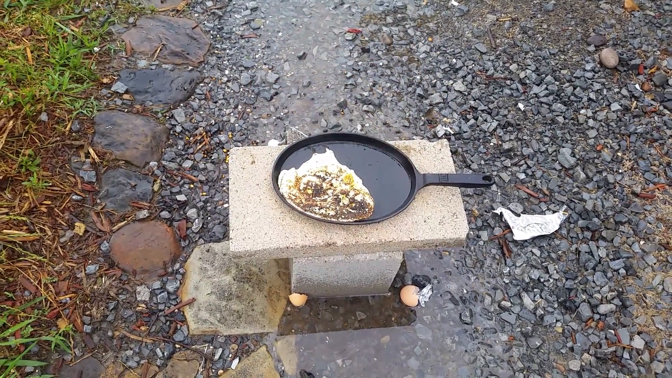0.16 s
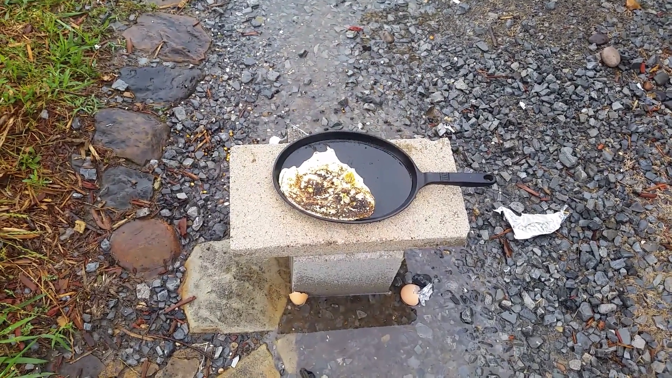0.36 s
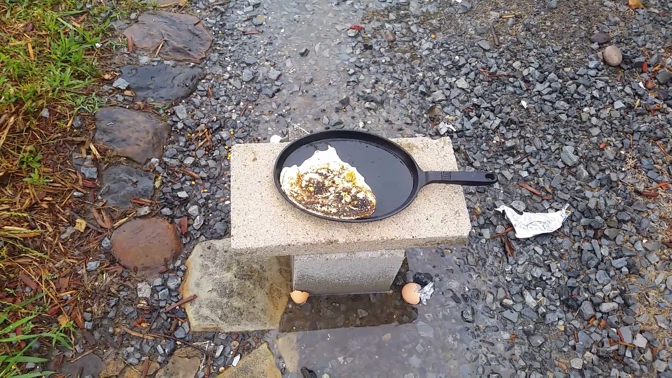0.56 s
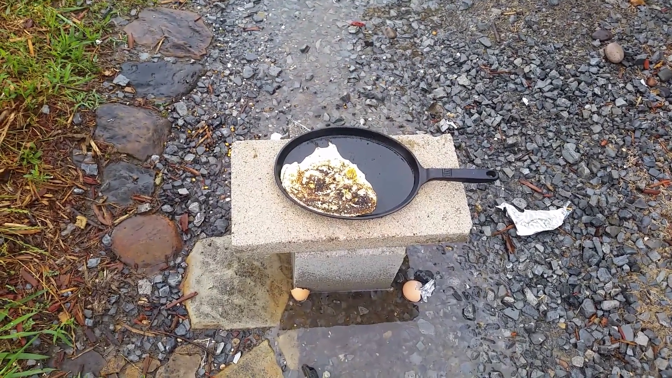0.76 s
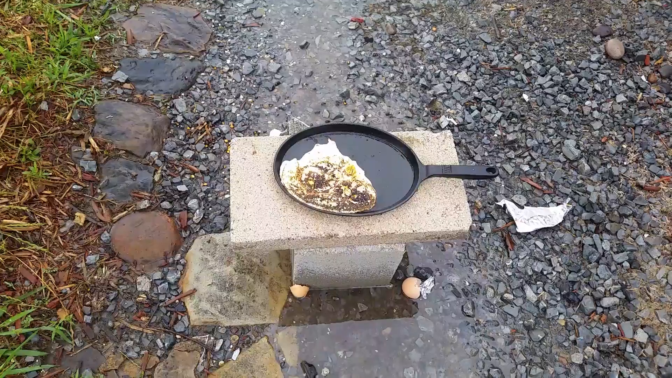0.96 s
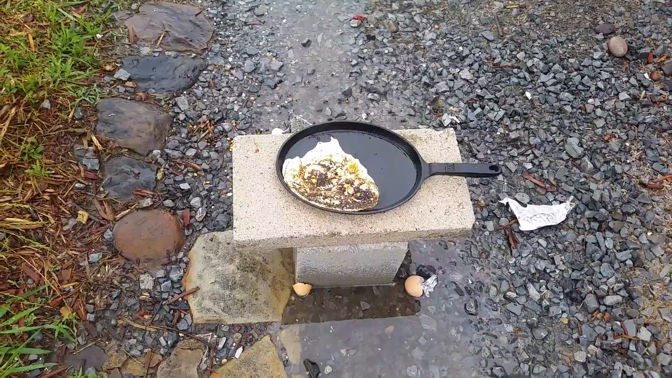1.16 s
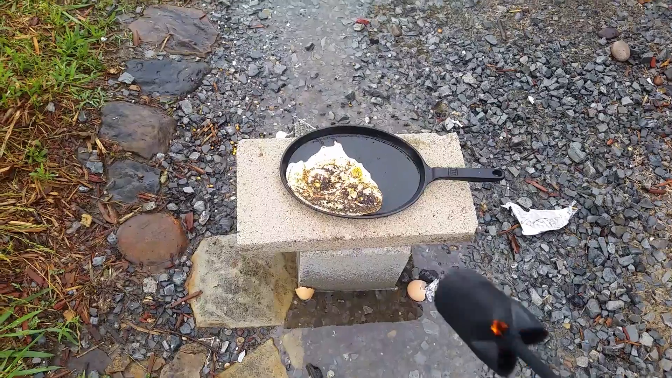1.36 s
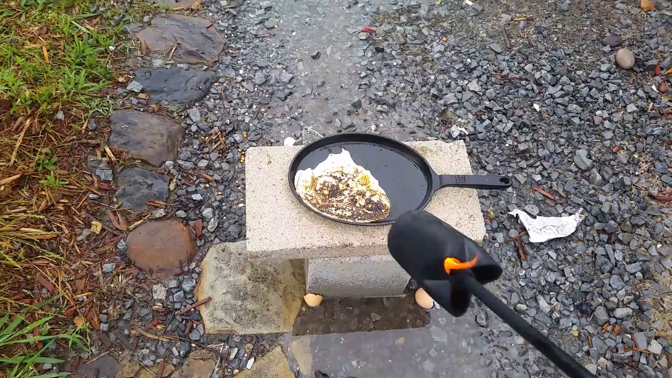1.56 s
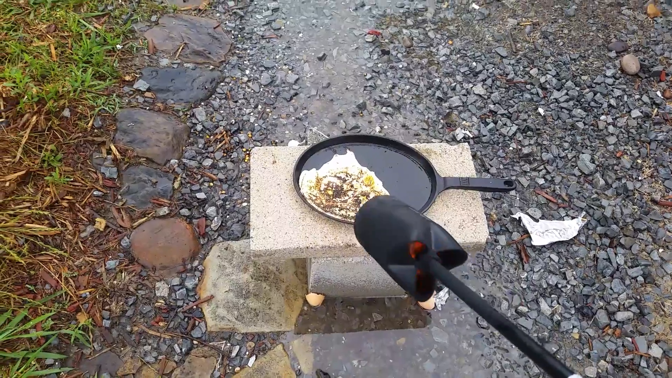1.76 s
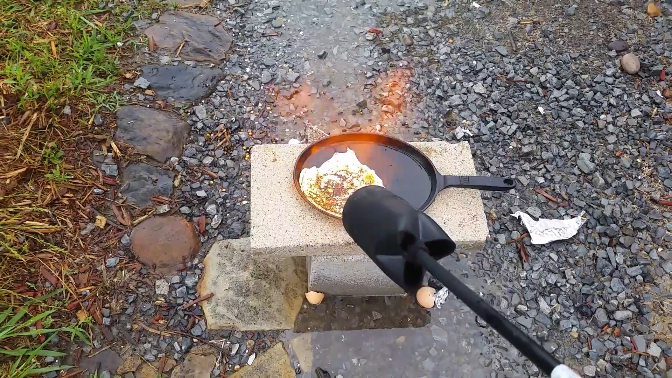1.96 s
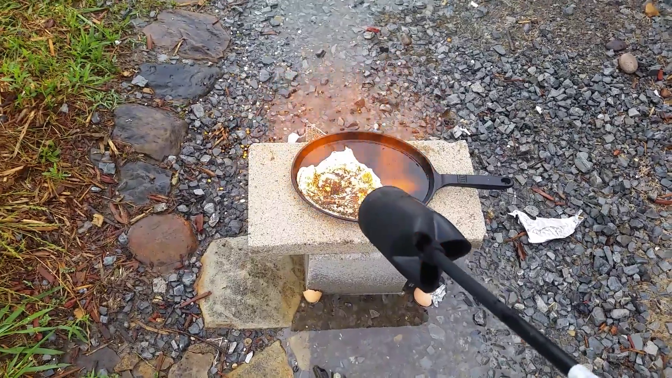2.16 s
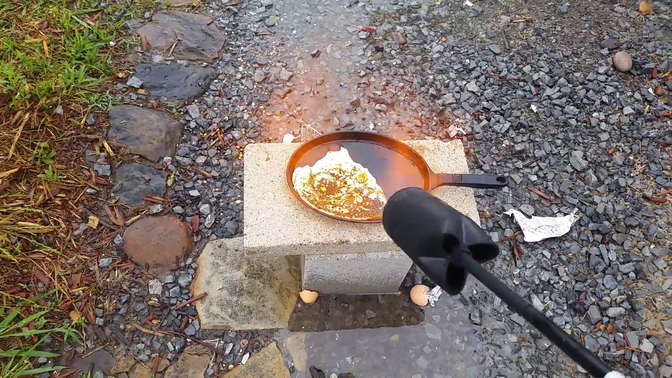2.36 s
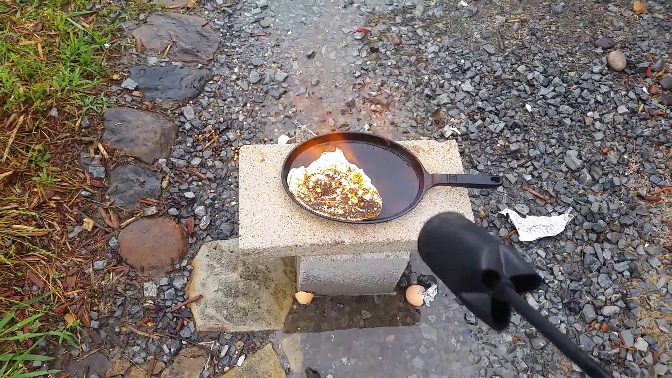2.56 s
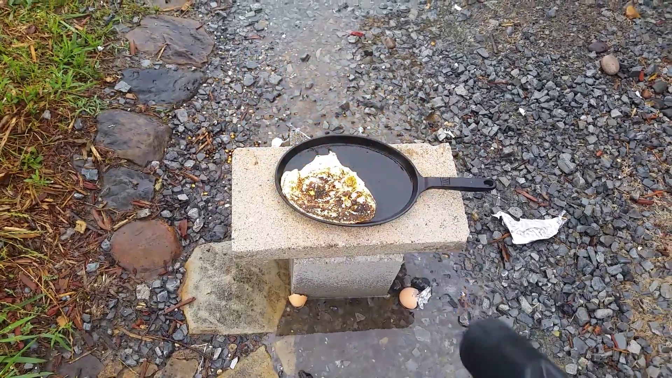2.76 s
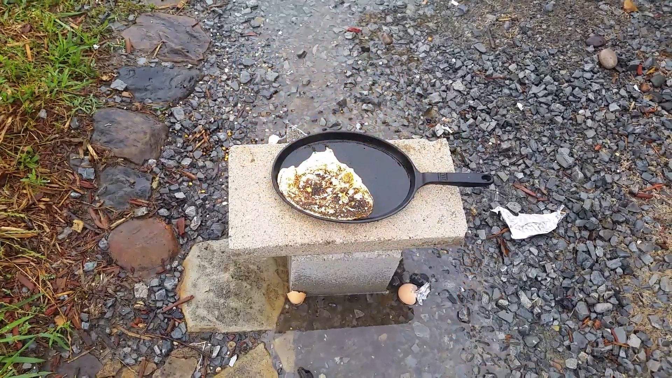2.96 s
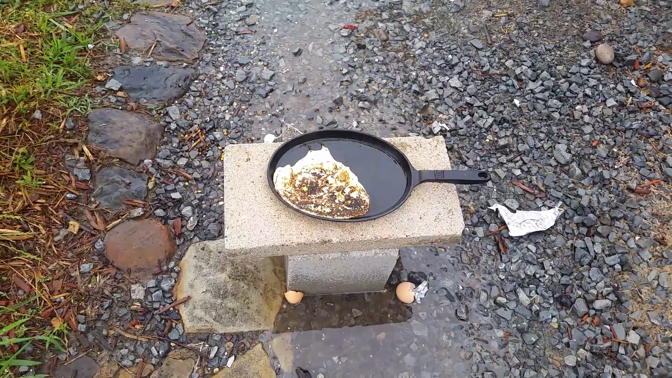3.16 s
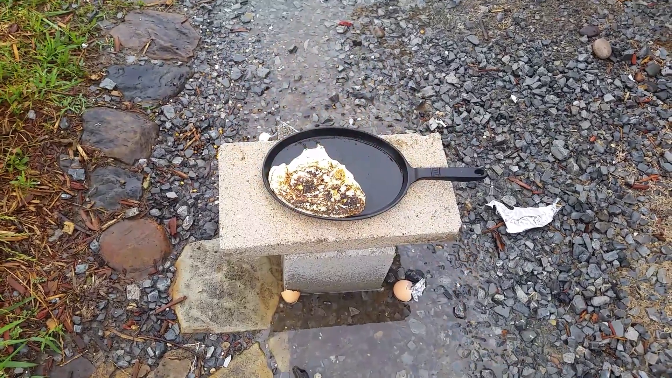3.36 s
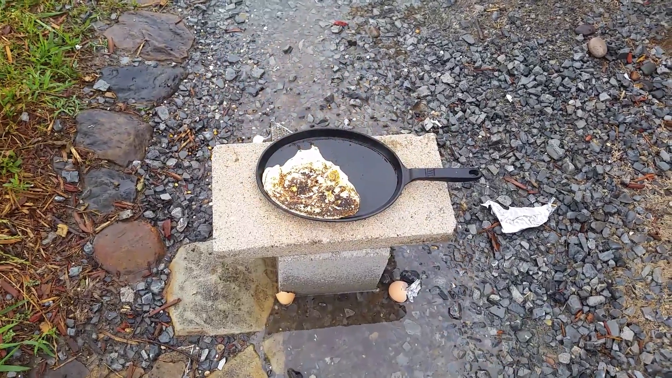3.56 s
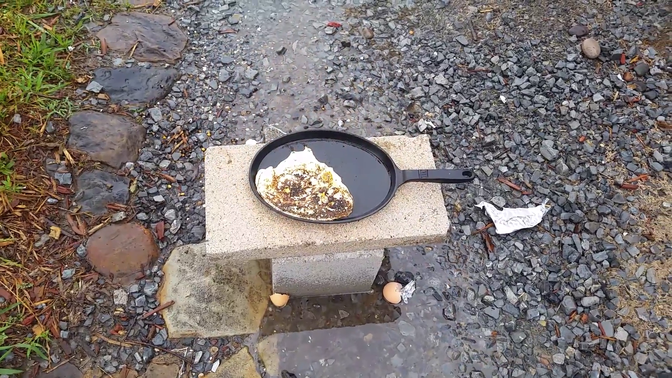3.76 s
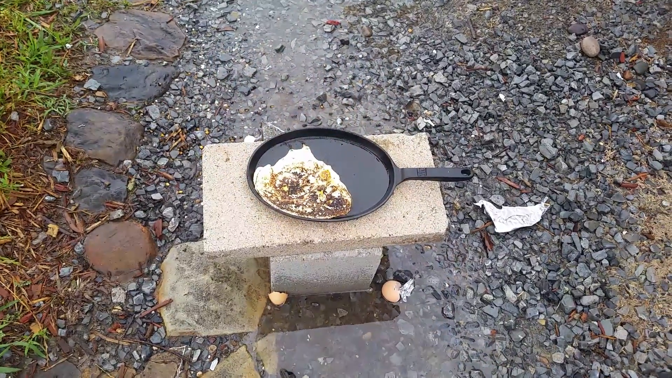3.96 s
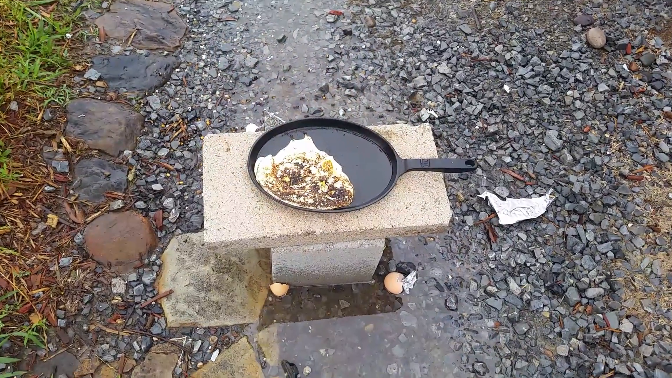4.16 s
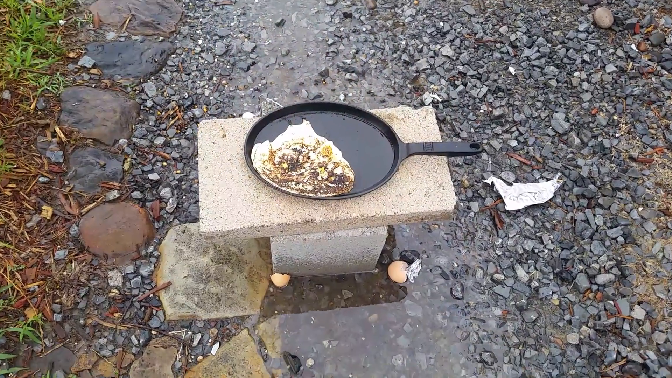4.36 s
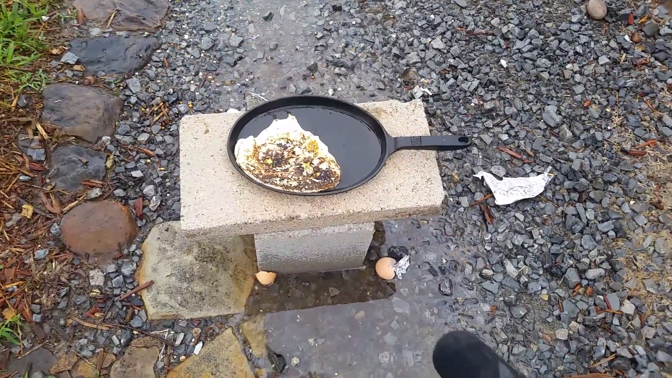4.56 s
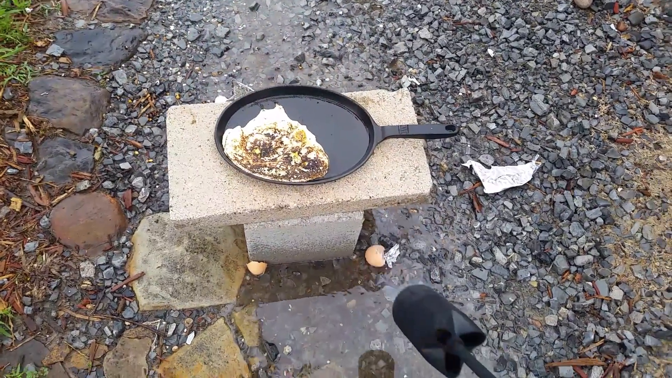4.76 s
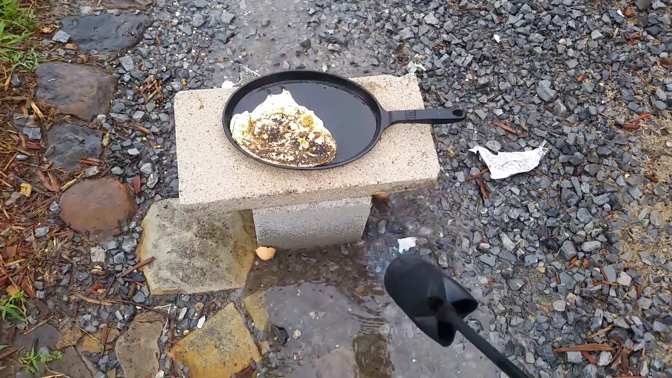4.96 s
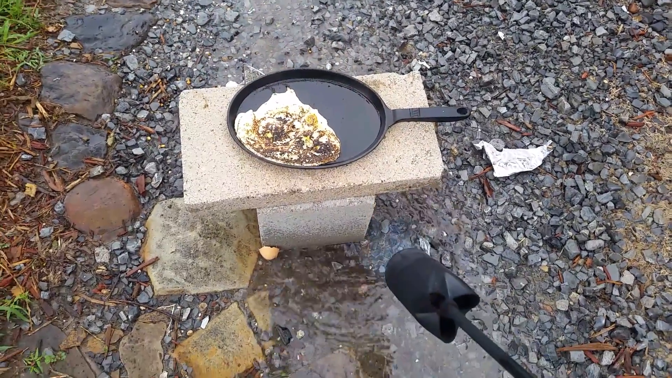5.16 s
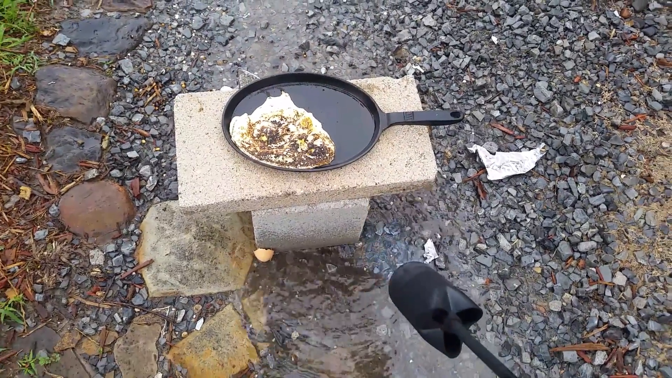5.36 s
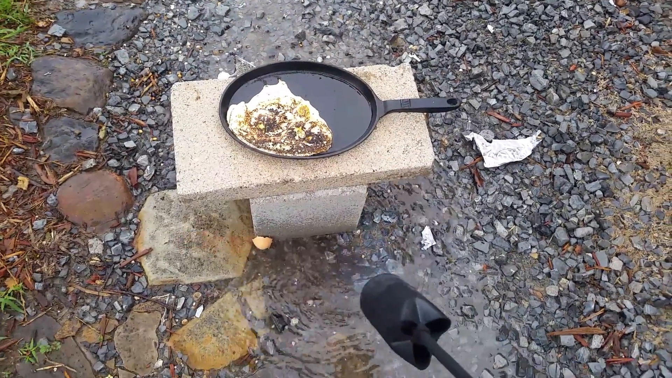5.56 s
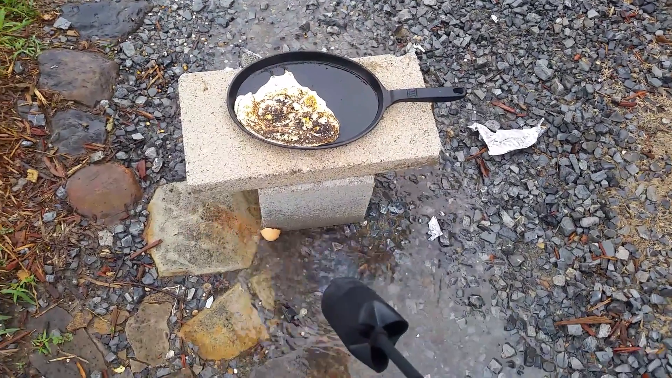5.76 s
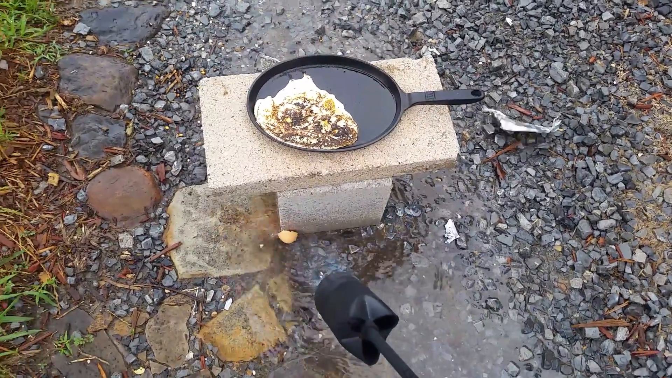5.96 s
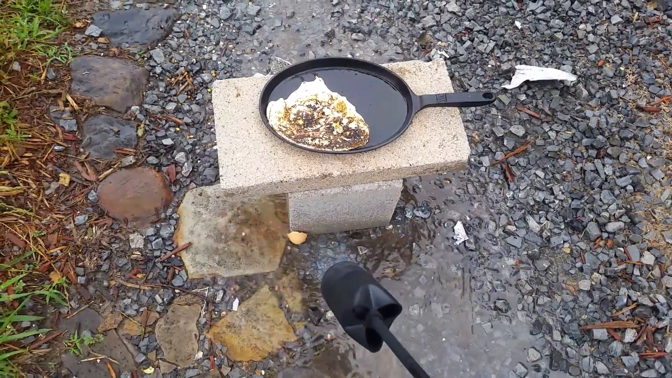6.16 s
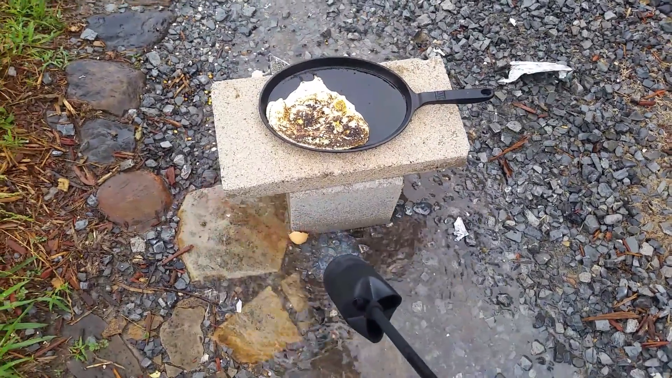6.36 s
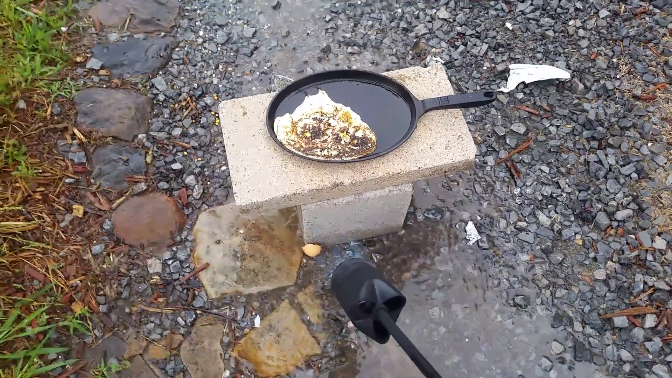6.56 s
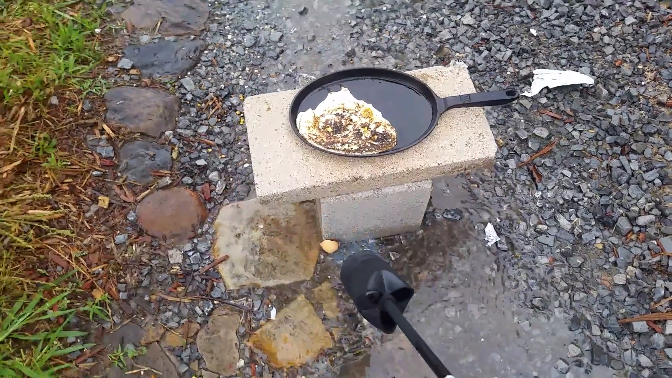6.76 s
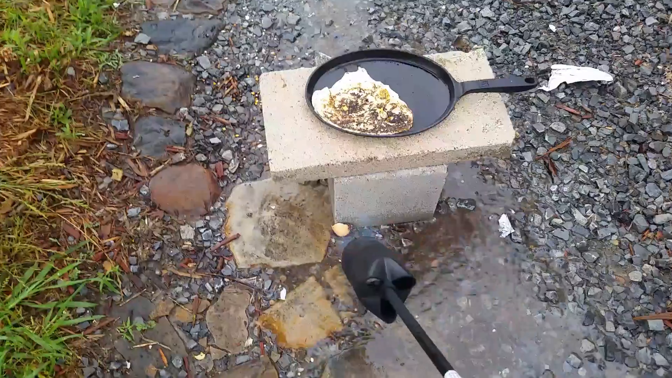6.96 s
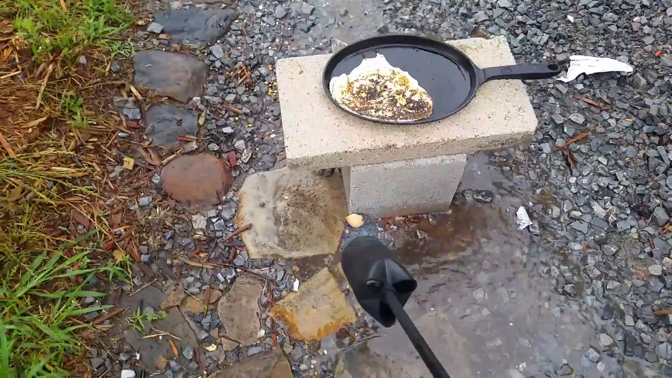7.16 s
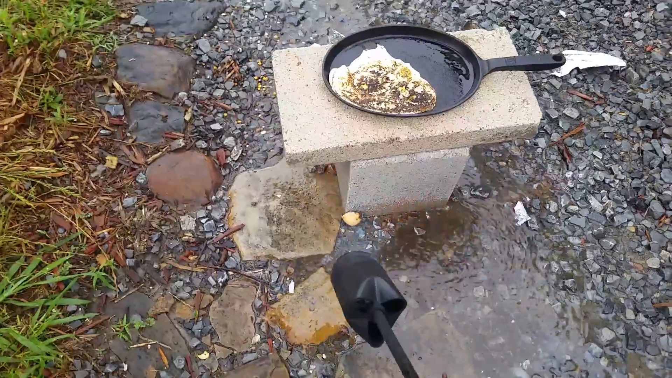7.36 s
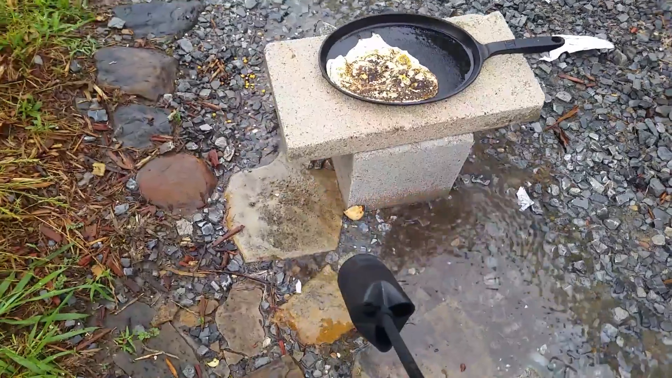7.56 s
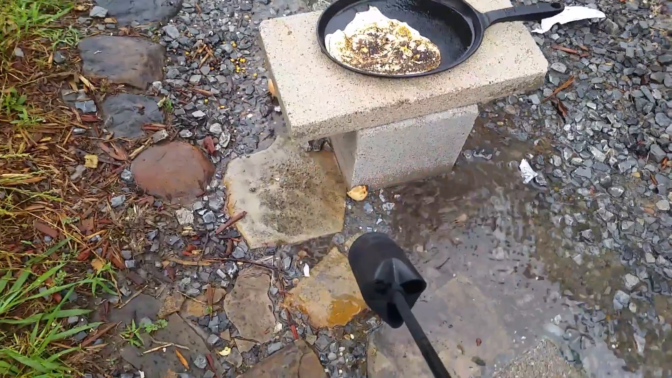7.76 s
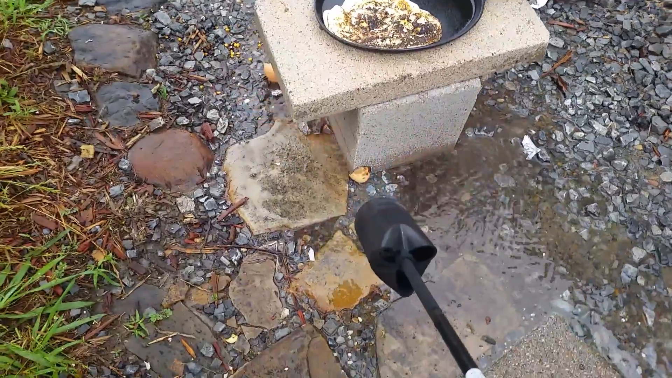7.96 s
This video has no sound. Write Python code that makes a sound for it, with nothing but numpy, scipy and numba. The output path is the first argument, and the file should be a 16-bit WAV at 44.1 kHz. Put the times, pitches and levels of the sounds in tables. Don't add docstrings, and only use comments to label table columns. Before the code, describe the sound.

Outdoors, hot fat ticks and a small flame hisses before a gas torch thumps alight, roars briefly, stops, then relights harder and roars on.

```python
import sys
import numpy as np
from scipy import signal
from scipy.fft import rfft, irfft, next_fast_len
from scipy.io import wavfile
from scipy.ndimage import uniform_filter1d
from numba import njit

SR = 44100
rng = np.random.default_rng(int(sys.argv[2]) if len(sys.argv) > 2 else 0)


def to_wav(s):
    ch = np.atleast_2d(s).T
    pcm = np.round(np.clip(ch, -1, 1) * 32767)
    wavfile.write(sys.argv[1], SR, pcm.astype(np.int16))


def level_to_linear(level):
    exponent = np.asarray(level, float) / 20
    return 10 ** exponent


N = 353241


def seconds():
    return np.arange(N) / SR


def rms_one(x):
    return x / np.sqrt(np.mean(x ** 2) + 1e-20)


def in_time(rows, silent=None):
    times, *columns = np.transpose(rows)
    return np.array([np.interp(seconds(), times, column, silent, silent) for column in columns])


def at_hz(points, hz):
    point_hz, value = np.array(points).T[:2]
    return np.interp(np.log(hz + 1), np.log(point_hz + 1), value)


def drift(rate):
    r = np.exp(-2 * np.pi * rate / SR)
    wander = signal.lfilter([1], [1, -2 * r, r * r], rng.standard_normal(N + SR))
    return rms_one(wander[SR:])


def lowpass(x, hz):
    return signal.sosfilt(signal.butter(2, hz, fs=SR, output="sos"), x)


def resonance(x, hz, width_hz):
    r = np.exp(-np.pi * width_hz / SR)
    push = np.array([1, 0, -1]) * (1 - r * r) / 2
    return signal.lfilter(push, [1, -2 * r * np.cos(2 * np.pi * hz / SR), r * r], x + 1e-18)


@njit
def gliding_resonance(x, two_r_cos, r):
    y = np.zeros_like(x)
    for i in range(2, len(x)):
        push = (1 - r[i]) * (x[i] - x[i - 2])
        y[i] = push + two_r_cos[i] * y[i - 1] - r[i] * r[i] * y[i - 2]
    return y


# (pitch [Hz], left minus right [dB])
PORT_BALANCE = [(60, -0.7), (250, -1), (700, 0.2), (1300, 5.5), (2400, 6.5), (3200, 9.5), (5500, 14),
                (7000, 8.5), (8500, -1.4), (15000, 0.4)]
# (pitch [Hz], phase [radians])
LEFT_LEAD = [(20, -.1), (250, .1), (1120, .5), (2410, .5), (3010, .05), (3450, -1.2), (3960, .05),
             (16600, -.1)]
# (pitch [Hz], likeness [-1 to 1])
FLAME_LIKENESS = [(60, .993), (250, .99), (500, .94), (1000, .72), (2400, .68), (4000, .45), (7000, .22),
                  (14000, .45)]
# (pitch [Hz], likeness [-1 to 1])
AIR_LIKENESS = [(60, .81), (130, .89), (290, .36), (640, .18), (1400, 0), (15000, 0)]


def port_noise(colour, likeness):
    size = next_fast_len(N)
    hz = np.arange(size // 2 + 1) * SR / size
    mid, side = rfft(rng.standard_normal((2, size)))
    alike = np.clip(at_hz(likeness, hz), -1, 1)
    tilt = level_to_linear(at_hz(PORT_BALANCE, hz))
    shared, different = np.sqrt(1 + alike) * mid, np.sqrt(1 - alike) * side
    left = (shared + different) * tilt / (1 + tilt) * np.exp(1j * at_hz(LEFT_LEAD, hz))
    right = (shared - different) / (1 + tilt)
    pair = irfft(level_to_linear(at_hz(colour, hz)) * np.array([left, right]), size)[:, :N]
    return pair / np.std(pair.mean(axis=0))


def torch():
    rumble_gain, boom_gain, bell_gain, jet_gain, bass_gain = burn_gains()
    eddies = drift(35)
    low = rumble_gain * rumble(eddies, bass_gain)
    flame = boom_gain * level_to_linear(0.73 * eddies + 0.37 * drift(10)) * boom()
    flame += bell_gain * level_to_linear(0.4 * eddies + 0.57 * drift(14)) * bell()
    hiss = jet_gain * jet(eddies)
    return low + ground_echo(flame) + dulled(hiss) - lighting_dips()


# (rumble [dB], boom [dB], bell [dB], jet [dB], bass added near the ground [dB])
BURNS = [
    (-20, -24, -25, -27.5, 2),
    (-17, -23.5, -27, -26.5, -12.5),
]
# (gas starts [s], jet full [s], cloud lights [s], flame full [s])
VALVE = [
    (1.9165, 1.928, 1.919, 1.943),
    (4.776, 4.796, 4.806, 4.815),
]
# (time [s], hollow pitch [Hz], gas flow [dB],
# flame into the hollow [dB], bell turned to the ports [dB])
WAND = [(1.95, 390, 0, -1.3, -9), (2.12, 363, 0, 1, 4.5), (2.35, 352, 0.1, 1, -5.5),
        (2.65, 355, 0.5, 1, 4.5), (4.85, 283, 0, -2.5, -3), (5.08, 260, 0, 3.5, 6.5),
        (5.45, 256, -0.03, 3.5, 5.5), (5.8, 278, 0.47, -2.5, -11.5), (6.2, 304, 0.25, -2.1, 5),
        (6.55, 312, 0.54, -.4, 4.5), (6.8, 345, 0.3, 1.5, 5.5), (7.1, 430, 0.55, -7, 5),
        (7.3, 530, 0.4, -2, 1.5), (7.6, 486, 0.3, -0.5, 1), (7.87, 472, 0.65, 3, -14),
        (8.01, 474, 0.6, 2, -14.5)]
FOLLOWS_FLOW = [.15, .15, 0.88, 3.2]
FOLLOWS_HOLLOW = [-0.21, 1.15, -0.013, 0.0046]
# (time [s], level [dB], width [s])
SPUTTER = (5.65, -5.5, .065)
# (loss after FADE_S [dB], steepness, afterglow [dB], afterglow loss [dB per s])
FADE = [
    (21, 3, -68.5, 55),
    (25, 2.5, -69, 36),
    (29, 2.25, -74.5, 40),
    (33, 2.8, -73, 100),
]
CLOSE_S, FADE_S = 2.603, 0.27
AFTERGLOW_S = 2.92, 3.12


def burn_gains():
    t, out, bass = seconds(), 0, 0
    hz, flow, hollow, turn = in_time(WAND)
    swing_db = np.outer(FOLLOWS_FLOW, flow) + np.outer(FOLLOWS_HOLLOW, hollow)
    sputter_s, sputter_db, sputter_width_s = SPUTTER
    swing_db[-1] += sputter_db * np.exp(-.5 * ((t - sputter_s) / sputter_width_s) ** 2)
    loss, steep, glow_db, glow_loss = np.transpose(FADE)[:, :, None]
    ends = [start[0] for start in VALVE[1:]] + [t[-1] + 1]
    for (*parts_db, bass_db), (gas, jet_full, lights, flame_full), end in zip(BURNS, VALVE, ends):
        jet_open = np.clip((t - gas) / (jet_full - gas), 0, 1)
        flame = np.clip((t - lights) / (flame_full - lights), 0, 1) + 0.13 * jet_open
        closed = np.clip(t - CLOSE_S, 0, 1) * (gas < CLOSE_S)
        level = level_to_linear(np.array(parts_db)[:, None] + swing_db - loss * (closed / FADE_S) ** steep)
        opening = np.array([flame, flame, 0.41 * jet_open + 0.47 * flame, jet_open])
        out = out + level * opening * (t < end)
        bass = bass + level_to_linear(bass_db) * (t >= gas) * (t < end)
    glow = level_to_linear(glow_db - glow_loss * (t - AFTERGLOW_S[0])) * (t > CLOSE_S) * (t < AFTERGLOW_S[1])
    return (*(out + glow), bass)


# (pitch [Hz], level [dB])
RUMBLE = [(20, -16.5), (45, -21), (85, -3.5), (130, -1.5), (180, 1.4), (240, -2.5), (320, -5.5),
          (500, -30.5), (900, -44)]
BASS_LIFT_HZ = 129


def rumble(eddies, bass_gain):
    low = port_noise(RUMBLE, FLAME_LIKENESS)
    low += bass_gain * lowpass(low, BASS_LIFT_HZ)
    return low * level_to_linear(0.2 * eddies + 0.9 * drift(33) + 0.38 * drift(9.0))


BOOM_WIDTH_HZ, BOOM_WIDENS = 130, .27


def boom():
    hz = in_time(WAND)[0]
    r = np.exp(-np.pi * (BOOM_WIDTH_HZ + BOOM_WIDENS * hz) / SR)
    centre = 2 * r * np.cos(2 * np.pi * hz / SR)
    pair = []
    for noise in port_noise([(20, 0), (20000, 0)], FLAME_LIKENESS):
        once = gliding_resonance(noise, centre, r)
        pair.append(gliding_resonance(once, centre, r))
    pair = np.array(pair)
    return pair / np.sqrt(uniform_filter1d(pair.mean(axis=0) ** 2, size=SR))


# (pitch [Hz], level [dB])
BELL = [(400, -27.5), (600, -1), (800, 1.5), (1000, 1), (1500, -4.5), (1720, -10), (2300, -11.5),
        (2900, -9), (3400, -15.5), (4000, -13.5), (5000, -16), (7000, -27), (9000, -40)]
# (pitch [Hz], width [Hz], level [dB],
# share of the turn [dB per dB], share of the hollow [dB per dB])
BELL_RINGS = [(1136, 94, -3, -0.18, 1.2), (1450, 430, -17.5, 1.3, .1), (2060, 420, -14, 0.7, .1),
              (2302, 200, -3.5, 1.1, .1), (2620, 150, -6, .7, 0.106), (4090, 230, -8, -0.67, .1)]
RING_FLICKER_DB = 4


def bell():
    sound = port_noise(BELL, FLAME_LIKENESS)
    hollow, turn = in_time(WAND)[-2:]
    for hz, width_hz, db, turned, sunk in BELL_RINGS:
        ring_db = db + turned * turn + sunk * hollow + RING_FLICKER_DB * drift(10)
        sound = sound + level_to_linear(ring_db) * resonance(sound, hz, width_hz)
    return sound / np.std(sound.mean(axis=0))


# (pitch [Hz], level [dB])
JET = [(3530, -39), (6000, -11), (8240, -9.5), (9560, -3.5), (10500, 1.5), (15100, 6.5), (15900, 3.5),
       (16200, -30), (16500, -42)]
# (pitch [Hz], width [Hz], level [dB])
JET_PATCHES = [(7740, 2500, -3.5), (10550, 1270, -4.5), (12600, 1340, -4.5), (14900, 1100, -5.5)]
PATCH_FLICKER_DB, JET_FLUTTER_DB = 3.2, .7


def jet(eddies):
    plain = port_noise(JET, FLAME_LIKENESS)
    hiss = plain
    for hz, width_hz, db in JET_PATCHES:
        hiss = hiss + level_to_linear(db + PATCH_FLICKER_DB * drift(5.4)) * resonance(plain, hz, width_hz)
    return hiss * level_to_linear(0.47 * eddies + JET_FLUTTER_DB * drift(28)) / np.std(hiss.mean(axis=0))


DULL_FROM_S, DULL_DB_PER_S, DULL_ABOVE_HZ = 2.6, 35, 11500


def dulled(hiss):
    t = seconds()
    high = signal.butter(2, DULL_ABOVE_HZ, "high", fs=SR, output="sos")
    top = signal.sosfiltfilt(high, hiss)
    loss_db = DULL_DB_PER_S * np.clip(t - DULL_FROM_S, 0, 1) * (t < VALVE[1][0])
    return hiss - top * (1 - level_to_linear(-loss_db))


# (time [s], peak level [dB], width [ms])
THUMPS = [
    (1.9454, -17, 2.2),
    (4.8135, -2.5, 1.5),
]


def lighting_dips():
    t = seconds()
    return sum(level_to_linear(db) * np.exp(-.5 * ((t - s) * 1000 / ms) ** 2) for s, db, ms in THUMPS)


# (time [s], delay [ms], signed strength)
GROUND = [(1.9, 3.44, -0.29), (2.95, 2.96, -0.29), (4.8, 1.12, 0.3), (5.8, 0.99, 0.014),
          (6.6, 0.92, -0.099), (7.0, .97, 0.27), (7.12, 2.43, -0.51), (7.4, 2.83, -0.031),
          (8.0, 2.7, -0.25)]
ECHO_CUT_HZ = 8200


def ground_echo(x):
    delay_ms, strength = in_time(GROUND)
    where = np.arange(N) - delay_ms * SR / 1000
    back = np.array([np.interp(where, np.arange(N), side) for side in lowpass(x, ECHO_CUT_HZ)])
    return x + np.clip(strength, -1, 1) * back


SWAY_SAMPLES = .9


def sway(pair):
    fine = signal.resample_poly(pair[0], 4, 1)
    where = len(fine) / N * (np.arange(N) + SWAY_SAMPLES * drift(0.56))
    return np.array([np.interp(where, np.arange(len(fine)), fine), pair[1]])


# (time [s], peak level [dB], left minus right [dB], sizzle time to fall 60 dB [s])
TICKS = [(.0442, -44, 1.5, .053), (.112, -45, -6, .065), (.3186, -27.5, -4, 0.18), (.5166, -40, -1.5, .18),
         (.6882, -44, 2.5, .04), (.7491, -52, 2.5, .25), (1.1821, -38, -5, .16), (1.272, -43, .1, .15),
         (1.3006, -10.5, 4, .083), (1.3378, -38, 6, .033), (1.438, -45, -2.5, .063),
         (1.5732, -25, -4, 0.076), (1.6635, -42, 3, .063), (1.715, -37, -8, .063), (2.8714, -33, 7, .033)]
# (time [s], peak level [dB], left minus right [dB])
HOT_TICKS = [(2.9653, -47, .1), (3.5135, -46, -6), (3.5571, -49, 4), (3.0338, -36.5, 1.5),
             (3.1553, -33.5, -3), (3.2017, -46, 1.5), (3.3404, -47, 2), (3.3828, -48, 2.5),
             (3.4422, -38, 3), (3.6572, -43, -1.5), (3.73, -29.5, 4), (3.7772, -38, 3), (3.8193, -40, -1.5),
             (3.9437, -37.5, .6), (3.9535, -29, .6), (4.0338, -44, 2.5), (4.0457, -41, .6),
             (4.0688, -37, 4.5), (4.0748, -35, 2.5), (4.1875, -33, -7), (4.2419, -40, 1.5),
             (4.3047, -38, 2.5), (4.35, -43, 2.5), (4.5148, -40, 1.5), (4.609, -39, 2.5),
             (4.6714, -41, 1.5), (4.7138, -44, 4), (4.7407, -45, -1.5), (4.7522, -36, 6), (4.7790, -33, .1)]
HOT_T60_S = 0.056
FAINT_DB, FAINT_SPAN_S = -51, (2.93, 4.7)


def all_ticks():
    start, end = FAINT_SPAN_S
    faint = []
    for a, b, c in rng.random((12, 3)):
        faint.append((start + (end - start) * a, FAINT_DB + 5 * (b - .5), 6 * (c - .3)))
    return TICKS + [(*row, HOT_T60_S) for row in HOT_TICKS + faint]


# (time [s], level [dB])
SPURT = [
    (0.83, -68),
    (0.838, -74),
    (0.856, -46),
    (0.896, -48.5),
    (0.95, -65),
]
# (pitch [Hz], width [Hz], level [dB])
TICK_BODY = [(6470, 3000, -1), (2600, 1500, -4)]
# (pitch [Hz], level [dB])
SIZZLE = [(1000, -39.5), (4000, -27), (7000, -9.5), (9500, -8), (11000, 1), (16000, -3)]
BURST_DELAY_S = .0016
SNAP_HZ, SNAP_WIDTH_HZ = 12700, 7200
BODY_DB, BIG_DROP_DB, BIG_BODY_SHARE = -12, -24, 0.53
TAIL_DB, TAIL_TOP_DB = -21, -46


def ticks():
    clicks, body, sizzle = np.zeros((3, 2, N))
    for s, db, pan_db, t60 in all_ticks():
        i = round((s + BURST_DELAY_S) * SR)
        sides = level_to_linear(np.array([pan_db, -pan_db]) / 2)
        clicks[:, i] += level_to_linear(db + 12.5) * sides
        body[:, i] += level_to_linear(db + BODY_DB + BIG_BODY_SHARE * max(db - BIG_DROP_DB, 0) + 9.5) * sides
        age = np.arange(min(N - i, SR // 4)) / SR
        tail_db = min(db + TAIL_DB, TAIL_TOP_DB) - 60 * age / np.clip(t60, .01, .3)
        sizzle[:, i:i + len(age)] += level_to_linear(tail_db) * sides[:, None]
    sizzle += level_to_linear(in_time(SPURT, -200)[0])
    snap = resonance(resonance(clicks, SNAP_HZ, SNAP_WIDTH_HZ), SNAP_HZ, SNAP_WIDTH_HZ)
    snap += sum(level_to_linear(db) * resonance(body, hz, width_hz) for hz, width_hz, db in TICK_BODY)
    return snap + sizzle * port_noise(SIZZLE, AIR_LIKENESS)


# (time [s], peak level [dB])
KNOCKS = [(0.29, -44), (.392, -37.5), (.398, -32), (.424, -43), (.540, -37.5), (0.574, -52), (0.867, -52),
          (1.271, -54), (4.128, -44), (4.262, -57), (4.374, -41), (4.68, -54)]
# (pitch [Hz], level [dB], time to fall 60 dB [s])
HANDLE = [(237, 0, 0.12), (345, -17, 0.041), (440, 4, 0.027), (557, -8, .09), (820, -8.5, 0.079),
          (1140, -12, .04)]
CONTACT_HZ = 900


def knocks():
    at = [round(s * SR) for s, db in KNOCKS]
    out = np.zeros(N)
    for hz, level_db, t60 in HANDLE:
        clicks = np.full(N, 1e-18)
        clicks[at] = level_to_linear(np.array(KNOCKS)[:, 1] + level_db - 7.5 + rng.normal(0, 0.83, len(at)))
        r, w = level_to_linear(-60 / (t60 * SR)), 2 * np.pi * hz / SR
        out += signal.lfilter([0, np.sin(w)], [1, -2 * r * np.cos(w), r * r], clicks)
    return lowpass(out, CONTACT_HZ)


# (time [s], level [dB rms], time to fall 60 dB [s])
SCUFFS = [
    (.515, -50.5, 0.23),
    (.85, -52, 0.36),
    (1.27, -49, 0.074),
    (4.742, -49, 0.28),
]
# (pitch [Hz], level [dB])
SCUFF = [(300, -15), (600, -5), (1200, -7), (2200, -5), (3200, -10), (6000, -25)]


def scuffs():
    t, gain = seconds(), 0
    for s, db, t60 in SCUFFS:
        gain = gain + (t >= s) * level_to_linear(db - 60 * np.maximum(t - s, 0) / t60)
    return gain * port_noise(SCUFF, AIR_LIKENESS)


# (time [s], peak level [dB])
GUSTS = [
    (1.57, -49),
    (4.14, -60),
    (4.43, -39.5),
    (4.68, -45),
]
# (time [s], peak level [dB], pitch [Hz], length [ms])
LUMPS = [(1.57, -34, 70, 16), (4.184, -44, 85, 15), (4.268, -39, 140, 6.1), (4.388, -34, 109, 8.3),
         (4.43, -25, 75, 4), (4.475, -43, 88, 10), (4.718, -42, 95, 12)]
BREEZE_DB, GUST_FALL_DB_PER_S, WIND_LUMPS_DB = -63.5, 109, 3.5


def wind():
    t = seconds()
    gain = level_to_linear(BREEZE_DB + duck())
    gain = gain + sum(level_to_linear(db - GUST_FALL_DB_PER_S * np.abs(t - s)) for s, db in GUSTS)
    colour = [(25, -18), (70, 12.0), (130, -2.5), (220, -14), (400, -40.5), (1500, -81)]
    out = gain * level_to_linear(WIND_LUMPS_DB * drift(28)) * port_noise(colour, FLAME_LIKENESS)
    for s, db, hz, ms in LUMPS:
        age = t - s
        out = out - level_to_linear(db) * np.exp(-.5 * (age * 1000 / ms) ** 2) * np.cos(2 * np.pi * hz * age)
    return out


REST_DB, DUCKED_DB = 3, -8.5
DUCK_HOLD_S, DUCK_RECOVER_S, DUCK_ATTACK_S = 0.9, 0.27, .06


def duck():
    t = seconds()
    recovered = 1 - np.exp(-np.maximum(t - CLOSE_S - DUCK_HOLD_S, 0) / DUCK_RECOVER_S)
    first, second = (np.clip((t - valve[2]) / DUCK_ATTACK_S, 0, 1) for valve in VALVE)
    return REST_DB + (DUCKED_DB - REST_DB) * np.maximum(first - recovered, second)


# (pitch [Hz], level [dB rms])
HUM = [
    (75.4, -48.5),
    (118.4, -53),
]
HUM_WOBBLE_DB = 1.1


def machine_hum():
    t, hum = seconds(), 0
    for hz, db in HUM:
        loudness = level_to_linear(db + 1.0 + HUM_WOBBLE_DB * drift(1.8))
        hum = hum + loudness * np.sin(2 * np.pi * hz * t + 0.24 * drift(1.7))
    return hum * level_to_linear([[-.6], [.6]])


# (pitch [Hz], level [dB])
PILOT = [(300, -14), (600, -7.5), (1600, -15.5), (2300, -32.5), (2600, -11.5), (2950, -5), (3300, -12.5),
         (3700, -3), (4200, 0.2), (5200, -4.5), (5700, -14), (6500, -31), (8000, -37)]
PILOT_DB = -47


def pilot_hiss():
    hiss = rms_one(port_noise(PILOT, AIR_LIKENESS)[0])
    return level_to_linear(PILOT_DB + 0.35 * drift(9.4)) * hiss * [[1], [0]]


# (pitch [Hz], level [dB])
AIR = [(20, -12), (60, 0), (130, -8), (180, -14.5), (300, -20.5), (700, -23), (2000, -27), (4000, -50.5),
       (6000, -45), (8000, -42), (9500, -36.5), (11000, -33), (15800, -30.5), (16200, -56.5)]
AIR_DB, MIC_HISS_DB = -52.5, -67.5


def background():
    air = level_to_linear(AIR_DB + 0.51 * drift(6)) * port_noise(AIR, AIR_LIKENESS)
    own = level_to_linear(MIC_HISS_DB) * port_noise(SIZZLE, AIR_LIKENESS)
    return level_to_linear(duck()) * (air + machine_hum() + pilot_hiss()) + own


def scene():
    return sway(torch()) + ticks() + knocks() + scuffs() + wind() + background()


def band_limit(x):
    return signal.sosfilt(signal.butter(12, 17080, fs=SR, output="sos"), x)


CUTOFF_HZ = 15700


def record(dry):
    x = signal.sosfilt(signal.butter(2, 45, "high", fs=SR, output="sos"), dry)
    x = 1.3 * np.tanh(x / 1.3)
    x = signal.sosfilt(signal.ellip(8, .5, 45, CUTOFF_HZ, fs=SR, output="sos"), x)
    return band_limit(x)


dry = scene()
out = record(dry)
to_wav(out)
```